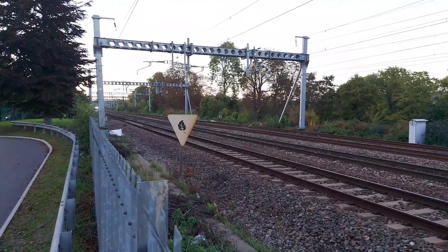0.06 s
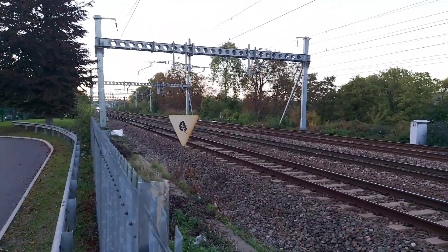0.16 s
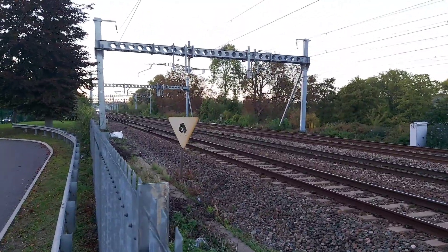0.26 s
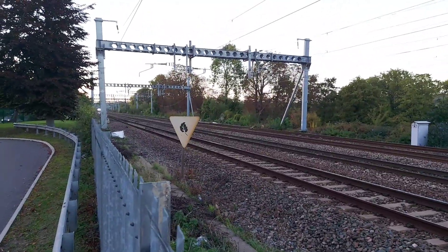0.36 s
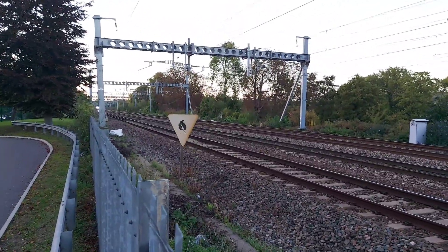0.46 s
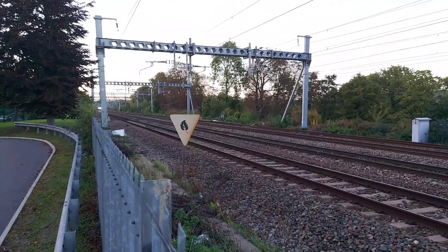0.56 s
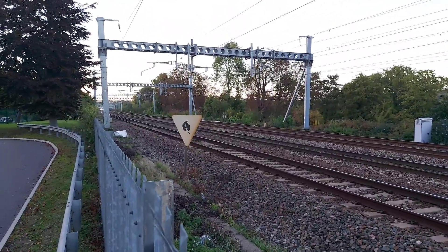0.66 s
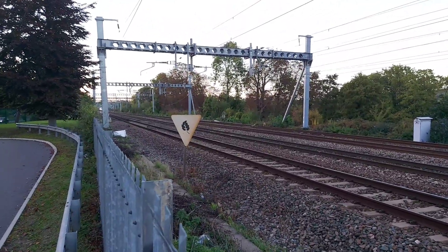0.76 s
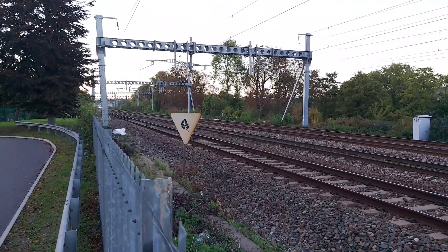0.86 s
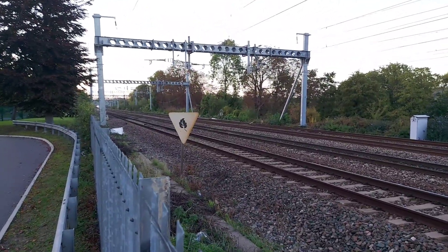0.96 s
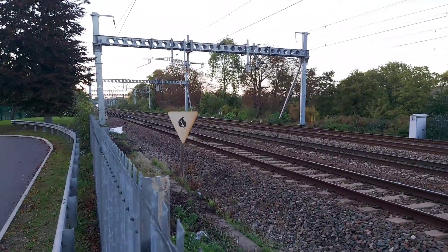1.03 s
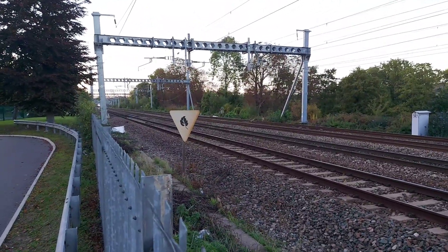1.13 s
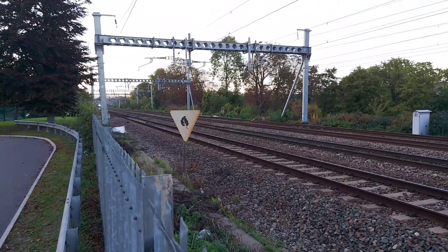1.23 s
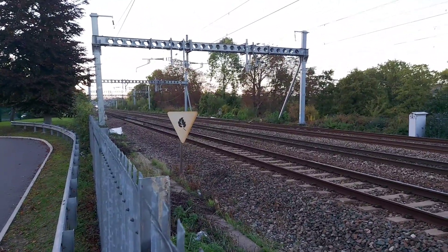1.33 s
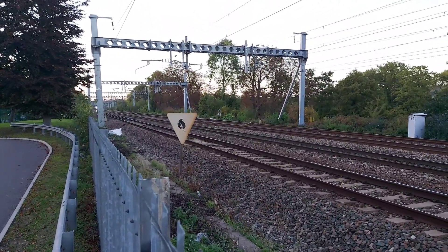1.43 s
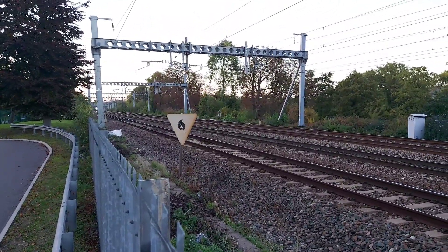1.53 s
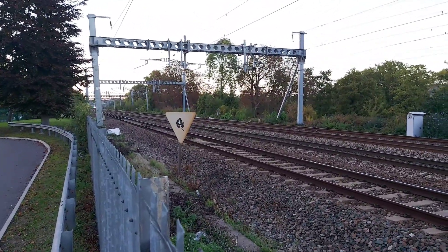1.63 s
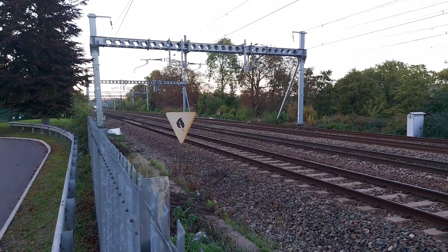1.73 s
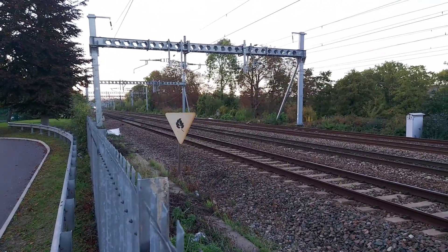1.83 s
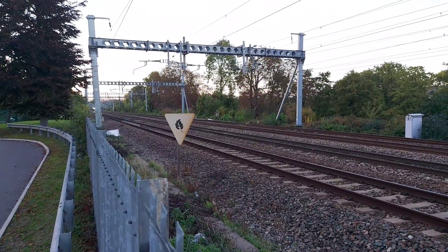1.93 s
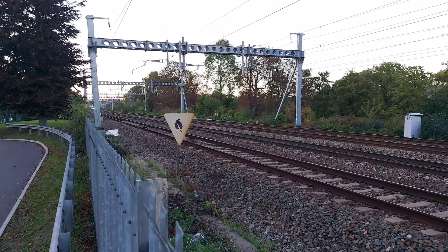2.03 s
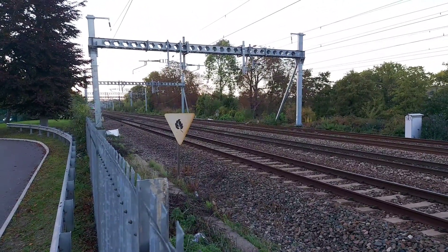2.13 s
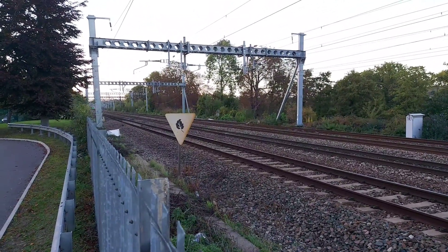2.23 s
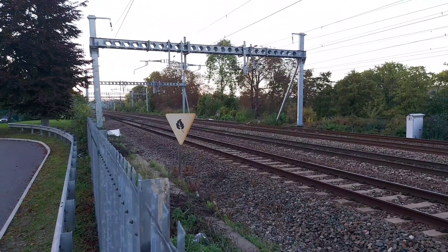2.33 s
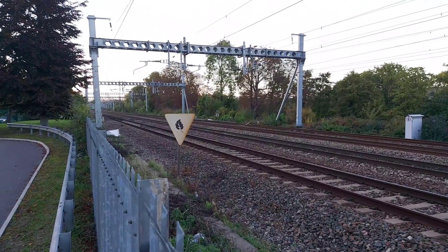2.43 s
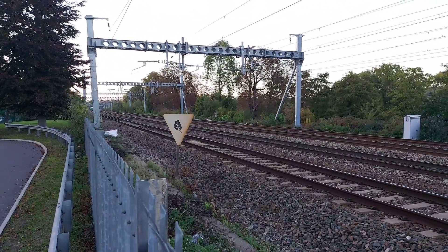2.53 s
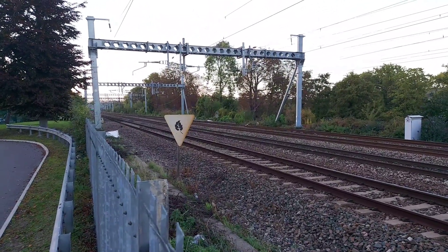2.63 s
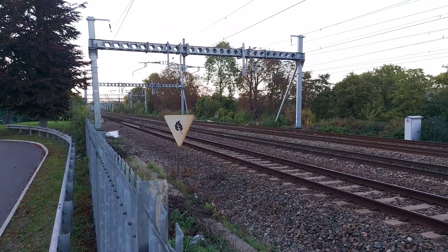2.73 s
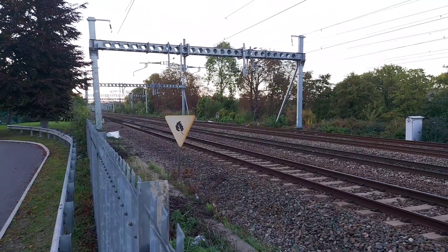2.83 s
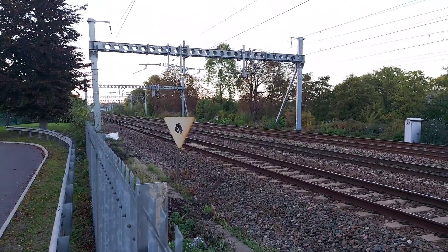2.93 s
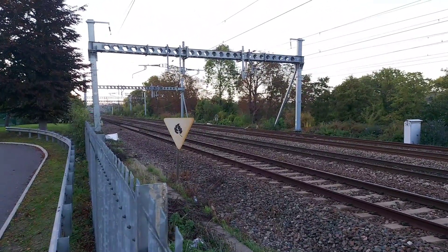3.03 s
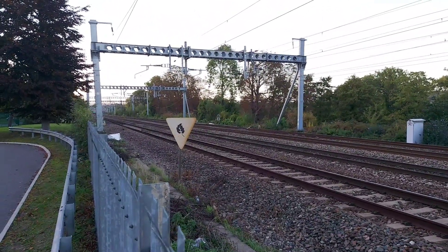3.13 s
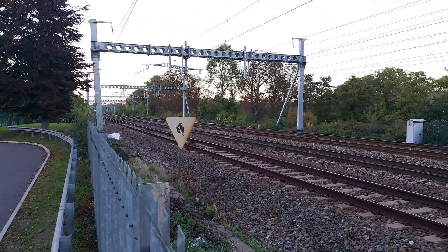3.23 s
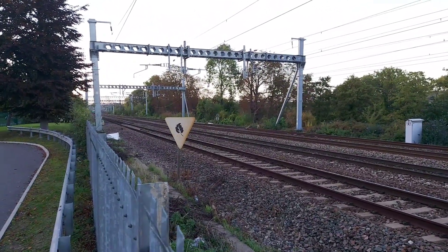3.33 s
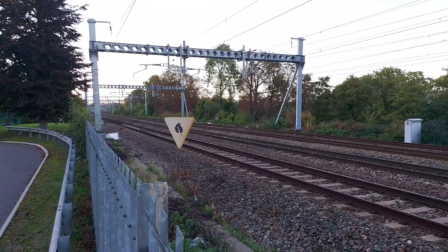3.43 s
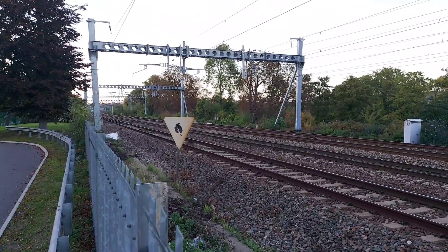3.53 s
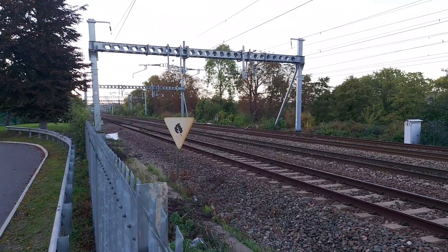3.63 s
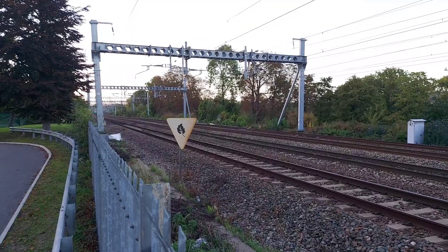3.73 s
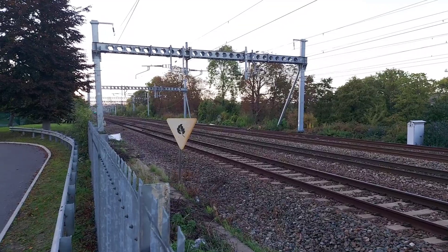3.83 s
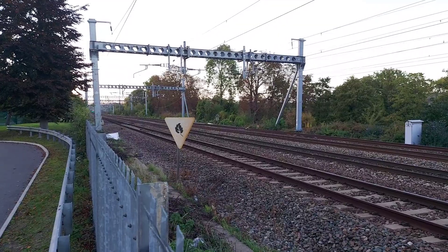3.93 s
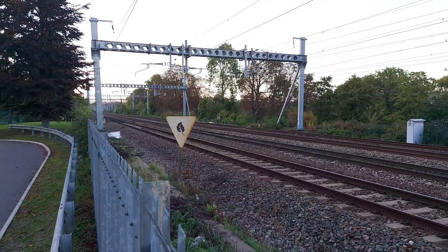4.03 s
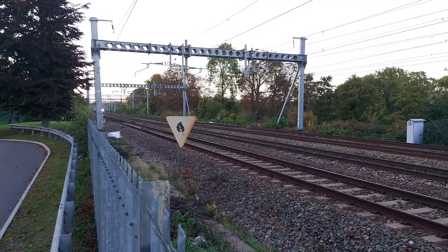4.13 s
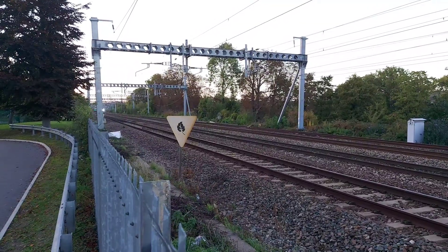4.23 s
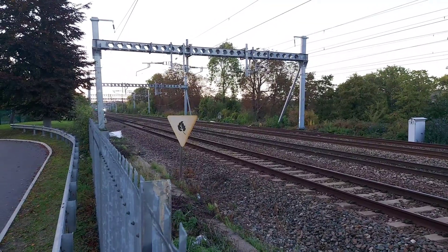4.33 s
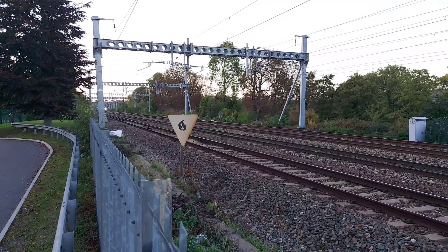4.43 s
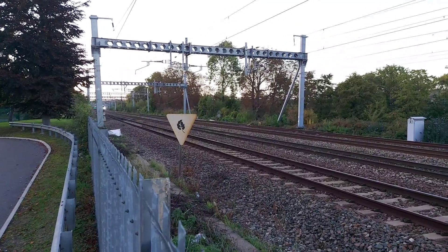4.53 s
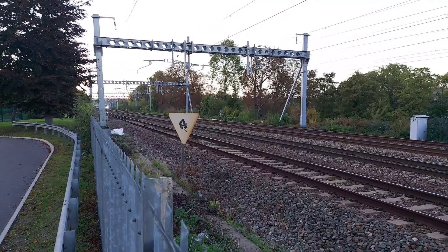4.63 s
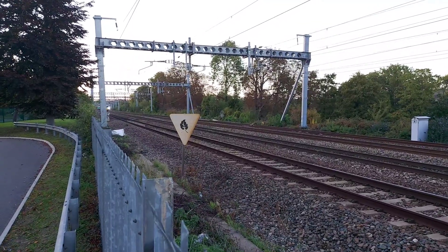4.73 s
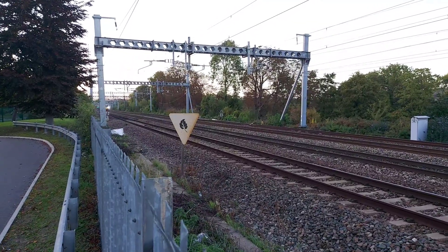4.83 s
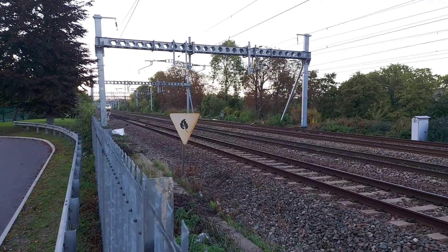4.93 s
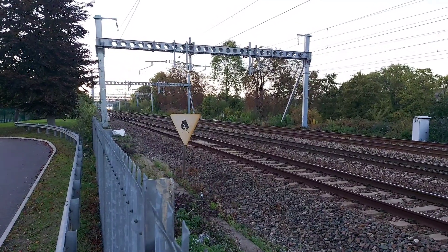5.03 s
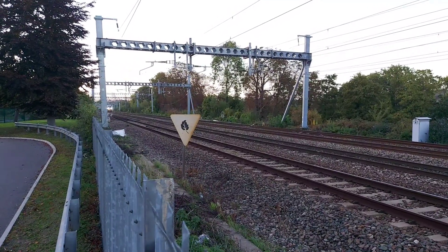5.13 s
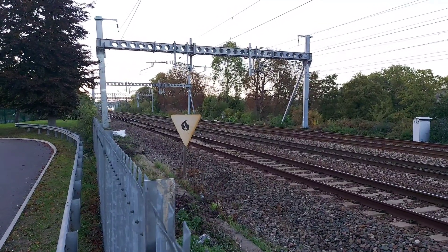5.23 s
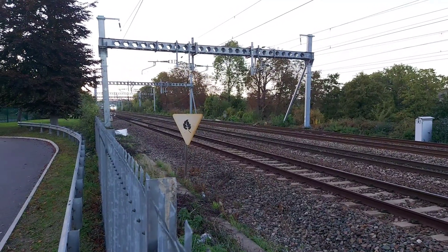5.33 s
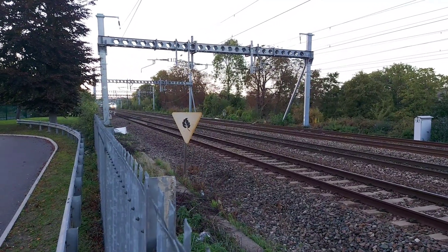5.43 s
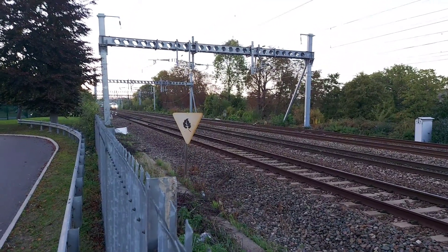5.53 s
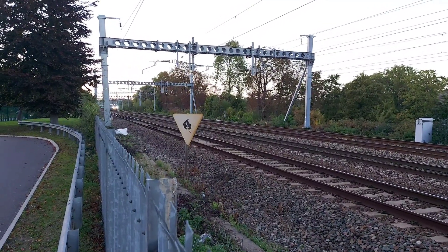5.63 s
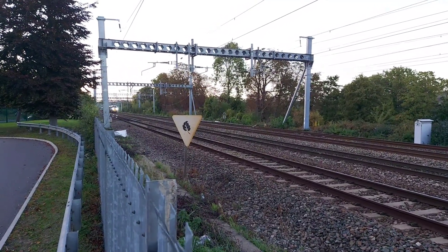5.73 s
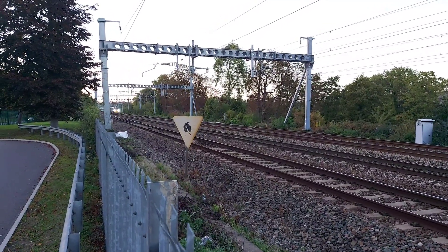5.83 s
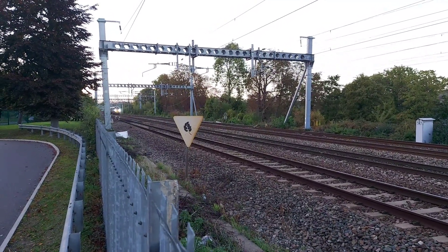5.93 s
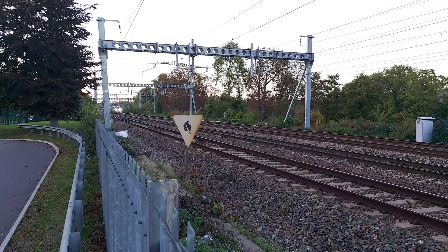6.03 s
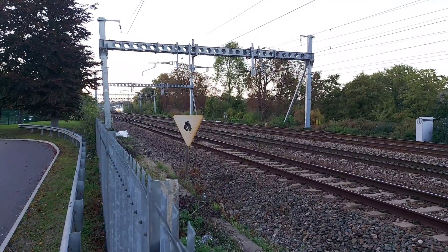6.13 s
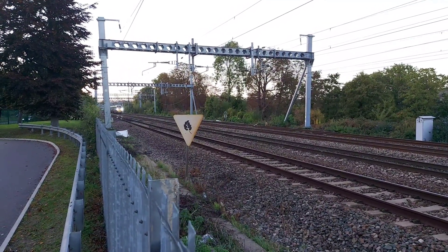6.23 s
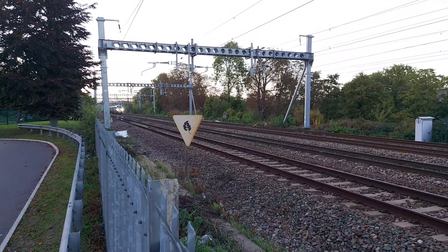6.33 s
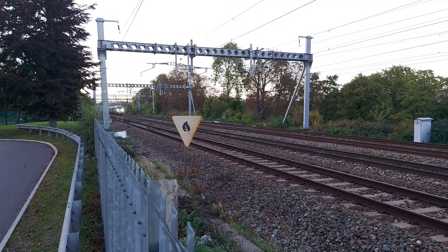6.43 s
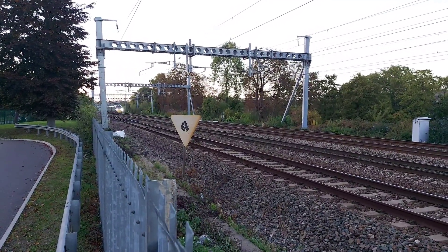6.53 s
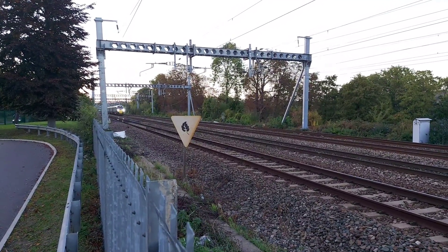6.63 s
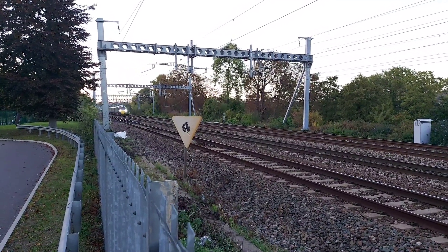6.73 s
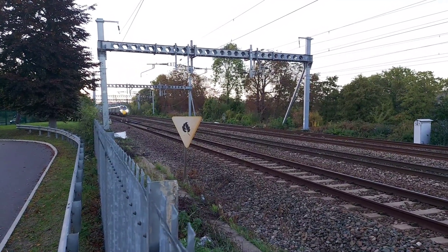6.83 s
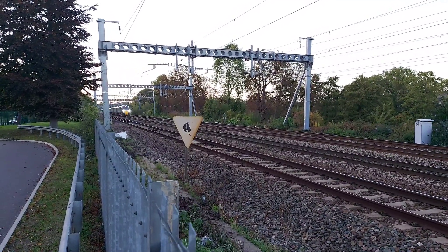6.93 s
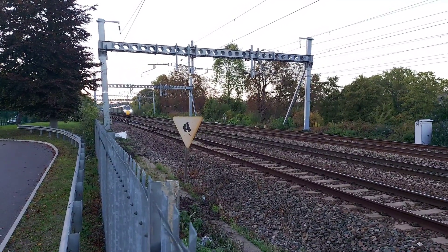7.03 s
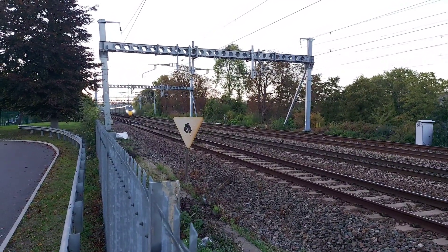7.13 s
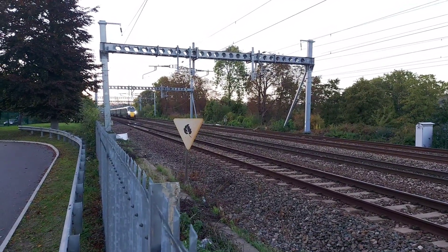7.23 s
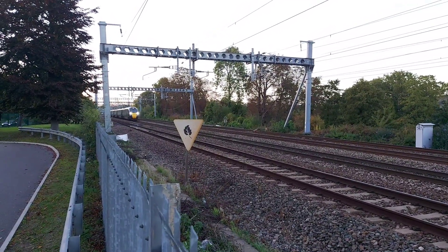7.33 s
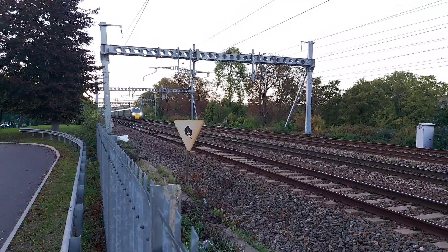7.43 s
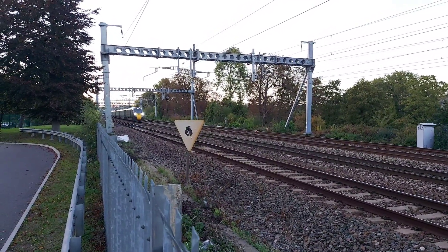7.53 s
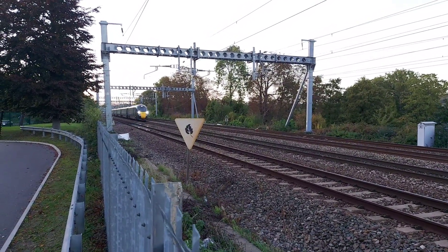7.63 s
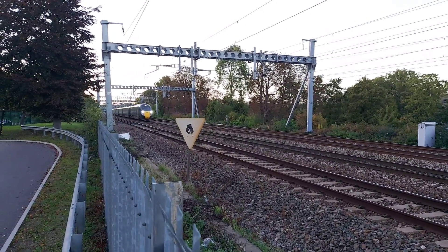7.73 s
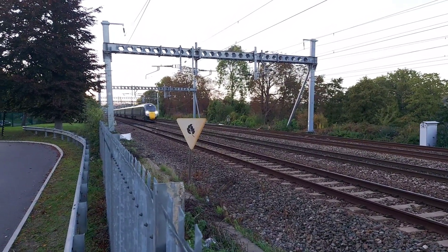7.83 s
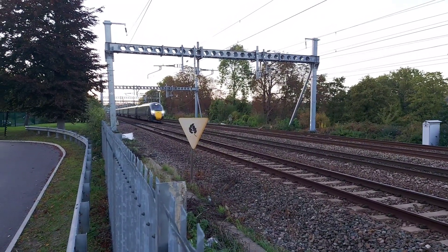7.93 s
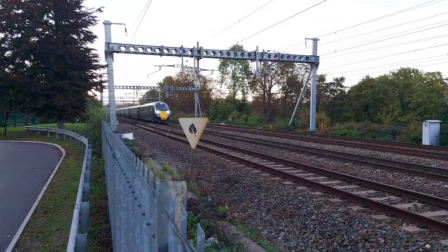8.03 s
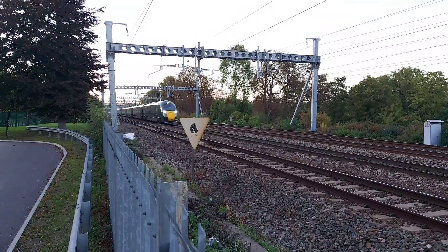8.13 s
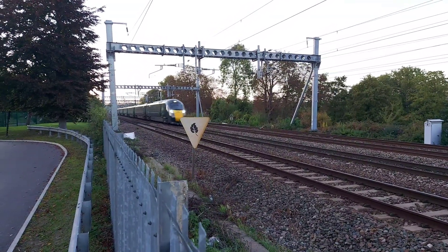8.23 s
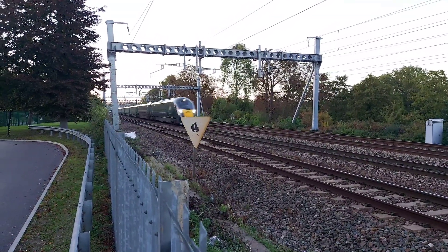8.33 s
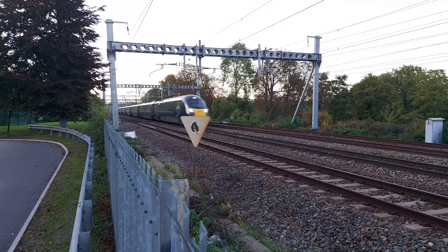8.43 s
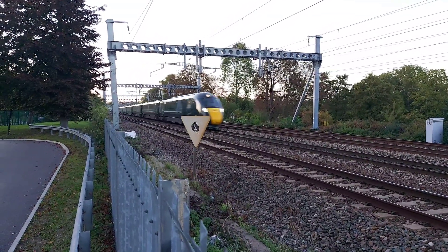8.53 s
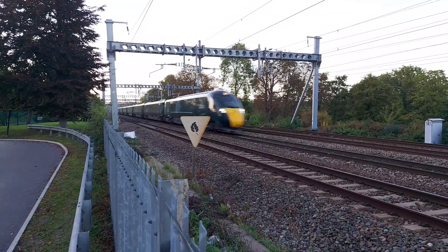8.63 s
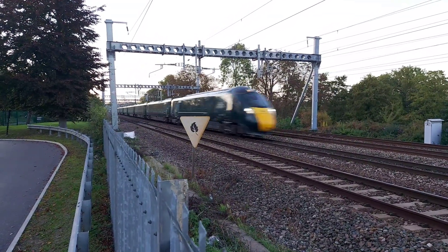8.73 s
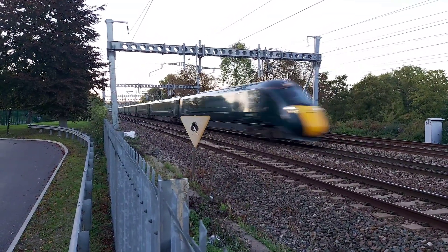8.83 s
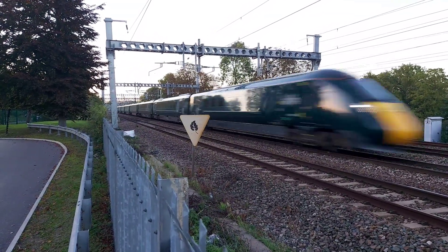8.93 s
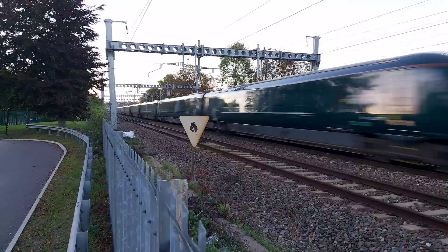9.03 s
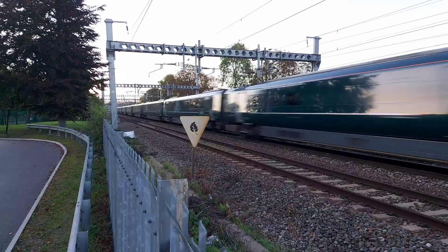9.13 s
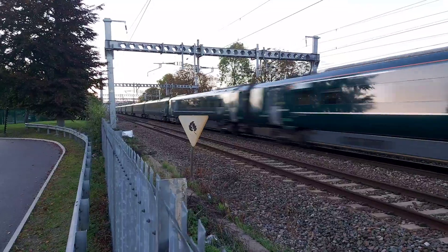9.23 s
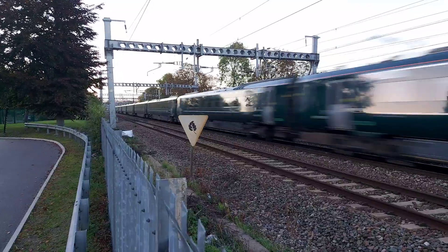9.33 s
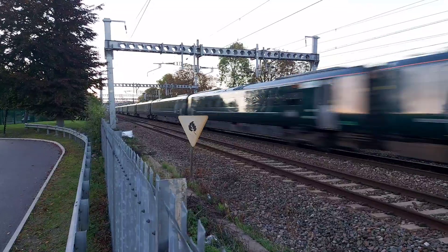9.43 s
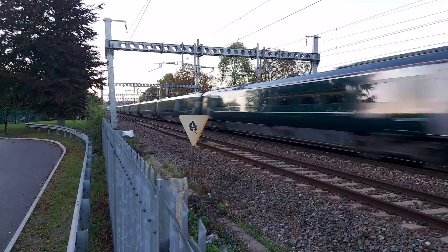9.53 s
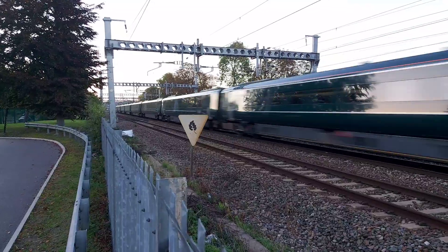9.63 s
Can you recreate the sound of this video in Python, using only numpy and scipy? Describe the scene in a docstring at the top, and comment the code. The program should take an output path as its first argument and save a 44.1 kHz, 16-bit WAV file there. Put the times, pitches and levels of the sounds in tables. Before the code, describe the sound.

Outdoors beside a railway, on a hand-held stereo phone: low traffic wash from the left, a few tiny bird whistles, dry ticks, and a car's tyres swelling softly near three seconds. Thin metallic singing rises in the rails, a dull roar grows behind it, then a fast electric train bursts past a few metres away, bright and rough, swinging right with a howl sinking in pitch.

```python
"""A fast electric train sweeps past a few metres from a hand-held phone, all built from shaped noise and tones.
It opens on far traffic to the left, bird whistles of bending sine, dry ticks of clipped-short noise, and a car
whose tyre noise crests near 3 s. The rails sing in narrow noise bands ahead of the train, over low rumble.
The roar of delayed noise from a row of bogies grows and brightens; near 9 s it surges and swings right.
A howl of noise-modulated tone sinks in pitch as the bow wave thumps the rumble, then a lull follows."""
import sys
import numpy as np
from scipy import signal
from scipy.fft import rfft, irfft, next_fast_len
from scipy.io import wavfile
from scipy.ndimage import map_coordinates

SR = 44100
rng = np.random.default_rng(int(sys.argv[2]) if len(sys.argv) > 2 else 0)


def to_wav(s):
    """Save 16-bit WAV."""
    ch = np.atleast_2d(s).T  # columns
    pcm = np.round(np.clip(ch, -1, 1) * 32767)  # PCM
    wavfile.write(sys.argv[1], SR, pcm.astype(np.int16))


N = 426447

# Level of the far traffic wash: (time [s], level [dB])
ROAD_LEVEL = [(0, -38), (1, -37.5), (2, -36.5), (3.2, -35), (9.67, -29)]
# Colour of the traffic wash: (frequency [Hz], relative level [dB])
ROAD_COLOUR = [(22, -10), (45, 3), (75, 2.5), (130, -5.5), (265, -5.5), (420, -21), (850, -11), (1300, -14),
               (2000, -19), (3000, -31.5), (4200, -41), (6000, -87), (8300, -69), (12000, -62),
               (15000, -60)]
# Level of a passing car's tyres: (time [s], level [dB])
CAR_LEVEL = [(0, -62), (1.2, -58.5), (2, -47), (3.2, -40.5), (4.2, -41), (5.5, -42.5), (9.67, -53)]
# Colour of the tyre noise: (frequency [Hz], relative level [dB])
TYRE_COLOUR = [(60, 4.5), (110, 10.5), (170, -3), (260, 1.5), (450, -8), (900, 0.5), (1300, -11),
               (2100, -4), (3000, -15.5), (4000, -14.5), (5800, -26), (7000, -39), (8500, -56),
               (16000, -69)]
# Bird whistles: (time [s], length [s], start pitch [Hz], end pitch [Hz], relative level [dB])
BIRD_WHISTLES = [(.66, .1, 3750, 4150, -62), (2.85, .1, 5600, 5800, -61), (2.98, .17, 6080, 6000, -62),
                 (3.11, 0.093, 4200, 4060, -57), (3.14, .11, 6100, 5900, -62),
                 (3.74, 0.51, 8570, 8590, -80)]
# Dry snaps: (time [s], peak level [dB])
TICK_HITS = [(1.697, -48), (2.578, -46), (5.572, -44), (5.592, -39), (5.602, -31)]
# Colour of the ground rumble: (frequency [Hz], relative level [dB])
RUMBLE_COLOUR = [(25, -16), (35, 12), (45, 26), (60, 26.5), (78, 27), (100, 15.5), (130, -1), (190, -42.5)]
# Rumble against nose distance: (close level [dB], knee [m], loss per doubling of distance [dB])
RUMBLE_DISTANCE = (-23.5, 73.4, 9.6)
# Waves guided by the rails:
# (centre [Hz], width [Hz], top level [dB], loss [dB/m], nose distance ahead when loudest [m])
RAIL_BANDS = [(1984, 24, -38, .42, 42), (1770, 160, -41, .24, 38), (3400, 140, -52.5, 0.5, 36),
              (3900, 380, -46, .23, 26), (5260, 670, -50.5, .7, 78), (6660, 710, -49, .3, 2),
              (7110, 170, -58.5, .3, 52), (10000, 3770, -47.5, .88, 13), (12115, 444, -58.8, .56, 80),
              (12650, 1320, -47, 1.02, 34), (13820, 1320, -46, .43, 37), (15150, 930, -52.8, .275, 40)]
# Stereo tilt of sound from up the line: (frequency [Hz], left minus right [dB])
AHEAD_TILT = [(200, -2), (600, 1.5), (1300, 5.5), (1850, 5.5), (2400, 7.5), (3300, 1), (4600, 2), (6500, 0),
              (8000, 0), (10000, 9), (12000, -2), (15000, 1.5)]
# Stereo tilt of the train close by: (frequency [Hz], left minus right [dB])
CLOSE_TILT = [(60, 0.0), (110, -1), (200, 0), (380, 0.5), (700, -0.5), (1290, 7.5), (2380, 7), (4400, -5.5),
              (8120, 1), (15000, 19)]
# Steady whine against nose distance: (close level [dB], knee [m], loss per doubling of distance [dB])
WHINE_DISTANCE = (-31, 30, 11.6)
# Bogies sweeping by: (time [s], strength of the surge [0-1], peak of the whine burst [dB])
BOGIE_SURGES = [(8.78, 0.65, -36), (9.13, 1, -24.5), (9.53, 0.66, -21)]
# Colour of the distant train: (frequency [Hz], relative level [dB])
FAR_COLOUR = [(110, 4), (165, -8.5), (240, 1), (370, -6.5), (520, -10), (900, -8.5), (1250, -15.5),
              (1950, -10), (2400, -14.5), (3300, -21.5), (5000, -30.5), (6900, -45), (8200, -59),
              (16000, -79)]
# Colour of the train close by: (frequency [Hz], relative level [dB])
CLOSE_COLOUR = [(110, -8), (170, -0.5), (230, 0), (370, -6.5), (520, -13.5), (640, -6), (760, -2),
                (950, -8), (1200, -10), (1480, -1), (2200, -6.5), (2750, -15), (6800, -25), (8500, -33),
                (16000, -49)]
# Wheel resonances added to the close colour: (centre [Hz], width [Hz], boost [dB])
WHEEL_RINGS = [(1380, 30, 2.5), (1580, 20, -2), (2000, 16, 8), (2333, 17, 6)]
# Edges of the four train bands: (frequency [Hz])
BAND_EDGES = [98, 450, 1150, 2700, 20000]
# Air rush, track roar, wheel ring, contact hiss: (close level [dB], knee [m],
# loss per doubling of distance [dB], surge [dB], surge delay [s], reach of the close colour [m])
BAND_LEVELS = [(-22, 16.7, 5, 1.5, -0.084, 36), (-23.5, 22.5, 6, 4, -0.014, 49),
               (-22, 20.9, 6.5, 2, -0.027, 29), (-28, 27.9, 8, 2.5, 0.075, 21.5)]
# Path down the line, as the train comes out from behind trees at a far bend: (time [s], gain [dB])
PATH_GAIN = [(0, -4), (1.2, -3), (1.9, -1.1), (3, -0.8), (4.4, 1.5), (6.7, -1.4), (7.8, -0.2)]
# Part of the sound that arrives scattered: (frequency [Hz], share of the power [0-1])
SCATTER_SHARE = [(60, 0.0043), (150, 0.01), (300, 0.02), (550, 0.26), (1200, 0.31), (2500, 0.44),
                 (6000, 0.58), (13000, 0.94)]

SPEED, TRACK_DISTANCE, TRACK_BEARING, ABREAST_S = 48.2, 7.4, -0.35, 9.165  # m/s, m, radians, s
COACH_LENGTH, BOGIE_SPACING = 29.2, 16.7  # m
PORT_LAG_S = 0.0005  # travel time between the two microphones
RAIL_SPREAD_M = 155  # length of the broad crest before the steady loss per metre sets in
SURGE_S, HOWL_S = 0.082, 0.049  # half-lengths of a surge and of its burst of whine
GUST_S, GUST_LENGTH_S, GUST_DB, LULL_DB = 9.32, 0.042, 9, -7  # bow-wave thump and the lull after it
TOP_HZ = 15700  # upper limit of the phone
TIME = np.arange(N) / SR
SIZE = next_fast_len(N, True)
FREQ = np.maximum(np.arange(SIZE // 2 + 1) * SR / SIZE, 1)
SIDES = np.array([[1], [-1]])  # left, right


def undb(db):
    """Decibels to gain."""
    return np.exp(np.asarray(db) * (np.log(10) / 20))


def unit(x):
    """Scale to rms 1."""
    return x / np.sqrt(np.mean(x ** 2))


def envelope(rows):
    """A (time, value) table joined by straight lines."""
    s, value = np.transpose(rows)
    return np.interp(TIME, s, value)


def shape(points):
    """A (frequency, value) table joined on a log-frequency axis."""
    hz, value = np.transpose(points)
    return np.interp(np.log(FREQ), np.log(hz), value)


def stereo_colour(colour_db, tilt):
    """Gain of a colour, with half the left-minus-right tilt given to each side."""
    return undb(colour_db + SIDES * shape(tilt) / 2)


def white(channels=2):
    """Spectra of unrelated white noises of rms 1."""
    real = rng.standard_normal((channels, len(FREQ)))
    imaginary = rng.standard_normal((channels, len(FREQ)))
    return (real + 1j * imaginary) * np.sqrt(SIZE / 2)


def sound(spectrum):
    """A spectrum as a waveform of rms 1."""
    return unit(irfft(spectrum, SIZE)[:, :N])


def flutter(rate, depth_db):
    """A gain that wanders at random, through rate new values a second."""
    steps = rng.standard_normal(1024)
    return undb(depth_db * np.interp(TIME * rate, np.arange(len(steps)), steps))


def swell(s, half_length):
    """A smooth rise and fall, 1 at time s."""
    return np.exp(-.5 * ((TIME - s) / half_length) ** 2)


def resonance(hz, width_hz):
    """Gain of a steep-sided peak, 1 at the centre."""
    return 1 / (1 + ((FREQ - hz) / width_hz) ** 2) ** 2


def ripple(spacing_hz, depth_db):
    """Fine, uneven peaks and dips along frequency, different at each microphone."""
    steps = rng.standard_normal((2, 2048))
    wander = [np.interp(FREQ / spacing_hz, np.arange(len(row)), row) for row in steps]
    return undb(depth_db * np.array(wander))


def nose_ahead():
    """Metres that the nose still has to go before it is abreast; negative once it is past."""
    return SPEED * (ABREAST_S - TIME)


def fade(close_db, knee_m, doubling_db):
    """Level in dB of a long source: steady alongside, falling per doubling of distance beyond the knee."""
    distance = np.maximum(nose_ahead(), 0)
    return close_db - doubling_db * np.log2(np.hypot(distance / knee_m, 1))


def port_lag(ahead):
    """Seconds by which the left microphone hears a point, ahead metres up the line, after the right."""
    return PORT_LAG_S * np.sin(TRACK_BEARING + np.arctan2(TRACK_DISTANCE, ahead))


def outdoors(direct):
    """Part of a sound comes by way of fence, trees and ballast, and differs at the two microphones."""
    share = np.clip(shape(SCATTER_SHARE), 0, 1)
    return np.sqrt(1 - share) * direct + np.sqrt(share) * white()


def noise_from(bearing):
    """Noise spectrum from a bearing (radians, left negative): the nearer microphone hears it first."""
    lag = PORT_LAG_S * np.sin(bearing)
    return outdoors(white(channels=1) * np.exp(-1j * np.pi * FREQ * lag * SIDES))


def road():
    """A wash of traffic far off to the left, slowly swelling."""
    tilt = [(300, 1.5), (1000, 0.5), (2200, 1.5), (4000, 5), (12000, 2)]
    wash = sound(noise_from(bearing=-0.91) * stereo_colour(shape(ROAD_COLOUR), tilt))
    return wash * undb(envelope(ROAD_LEVEL)) * flutter(rate=5, depth_db=0.5)


def car():
    """Tyre noise swells and fades on the road to the left."""
    tilt = [(300, -1), (1000, 2.5), (2200, 3), (3200, 2), (6000, 0.0)]
    tyres = sound(noise_from(bearing=-0.73) * stereo_colour(shape(TYRE_COLOUR), tilt))
    return tyres * undb(envelope(CAR_LEVEL)) * flutter(rate=6.7, depth_db=0.4)


def birds(echo_s=.03, quaver_hz=90, quaver_rate=250):
    """Thin whistles of sine with a random quaver, blurred by the trees around them."""
    whistles = np.zeros(N)
    for s, length, start_hz, end_hz, db in BIRD_WHISTLES:
        u = np.linspace(0, 1, int(length * SR))  # progress through the note
        start = int(s * SR)
        steps = rng.standard_normal(size=256)
        quaver = np.interp(u * length * quaver_rate, np.arange(len(steps)), steps)
        hz = start_hz + (end_hz - start_hz) * u + quaver_hz * quaver
        tone = np.sin(2 * np.pi * np.cumsum(hz) / SR)
        whistles[start:start + len(u)] += undb(db) * np.sin(np.pi * u) ** .5 * tone
    # the trees answer with a short burst of decaying noise, different on each side
    leaves = rng.standard_normal((2, 8192)) * np.exp(-TIME[:8192] / echo_s)
    leaves /= np.linalg.norm(leaves, axis=1, keepdims=True)
    blur = signal.oaconvolve(whistles[None], leaves, axes=1)[:, :N]
    return (whistles + blur) / np.sqrt(2)


def ticks(decay_s=0.0007):
    """Tiny dry snaps close by: band-passed noise that dies within milliseconds."""
    out = np.zeros(N)
    body = signal.butter(4, [2500, 6200], "band", fs=SR, output="sos")
    for s, db in TICK_HITS:
        burst = rng.standard_normal(512) * np.exp(-TIME[:512] / decay_s)
        snap = signal.sosfilt(body, burst)
        start = int(s * SR)
        out[start:start + len(snap)] += undb(db) * snap / np.abs(snap).max()
    return out


def rumble(lull_after_s=0.096):
    """The deep shudder of ground and air; the bow wave thumps just behind the nose, then a lull."""
    gust = GUST_DB * swell(GUST_S, GUST_LENGTH_S)
    lull = LULL_DB * swell(GUST_S + lull_after_s, GUST_LENGTH_S)
    shudder = sound(noise_from(bearing=TRACK_BEARING) * undb(shape(RUMBLE_COLOUR)))
    return shudder * undb(fade(*RUMBLE_DISTANCE) + gust + lull)


def rails():
    """Vibration runs far ahead in the steel in separate bands; a greater loss per metre rises faster."""
    # each band is a cluster of close modes
    colour = stereo_colour(0, AHEAD_TILT) * ripple(spacing_hz=55.1, depth_db=2.5)
    field = noise_from(bearing=TRACK_BEARING) * colour
    out = 0
    for hz, width_hz, top_db, loss_db_per_m, loudest_m in RAIL_BANDS:
        through_steel = np.hypot(nose_ahead() - loudest_m, RAIL_SPREAD_M) - RAIL_SPREAD_M
        gain = undb(top_db - loss_db_per_m * through_steel) * flutter(rate=14, depth_db=1.3)
        out = out + gain * sound(field * resonance(hz, width_hz))
    return out * flutter(rate=16, depth_db=0.7)


def whine(abreast_hz=748, doppler_hz=60, glide_m=28, width_hz=60, behind_nose=22, left_db=2.0):
    """A rough howl from the running gear bursts out as bogies sweep by, and sinks in pitch as it passes."""
    ahead = nose_ahead() + behind_nose
    hz = abreast_hz + doppler_hz * ahead / np.hypot(ahead, glide_m)
    steady = undb(fade(*WHINE_DISTANCE)) ** 2
    bursts = sum((undb(db) * swell(s, HOWL_S)) ** 2 for s, _, db in BOGIE_SURGES)
    phase = 2 * np.pi * (np.cumsum(hz) / SR - hz * port_lag(ahead) * SIDES / 2)
    # two slow noises on a cosine and a sine roughen the tone
    a, b = sound(white() * resonance(0, width_hz))
    howl = a * np.cos(phase) + b * np.sin(phase)
    return howl * np.sqrt(steady + bursts) * undb(SIDES * left_db / 2)


def bogies(count=6, falloff=0.5):
    """Noise spectrum of a row of bogies; the nearest leads, and each swings right as it passes."""
    field, power = 0, 0
    for k in range(count):
        ahead = nose_ahead() + k // 2 * COACH_LENGTH + k % 2 * BOGIE_SPACING
        # each shakes a stretch of rail, so it fades more slowly than a point source
        gain = np.hypot(ahead, TRACK_DISTANCE) ** -falloff
        right = rng.standard_normal(N)
        heard_at = np.arange(N) - port_lag(ahead) * SR
        left = map_coordinates(right, [heard_at], order=3, mode="mirror")
        field = field + gain * np.array([left, right])
        power = power + gain ** 2
    return outdoors(rfft(field / np.sqrt(power), SIZE))


def train():
    """Air rush, track roar, wheel ring and hiss: dull afar, resonant and bright close by, with surges."""
    field = bogies()
    wheels_db = sum(db * resonance(hz, width_hz) for hz, width_hz, db in WHEEL_RINGS)
    far = field * stereo_colour(shape(FAR_COLOUR), AHEAD_TILT)
    close = field * stereo_colour(shape(CLOSE_COLOUR) + wheels_db, CLOSE_TILT)
    out = 0
    for lo, hi, levels in zip(BAND_EDGES, BAND_EDGES[1:], BAND_LEVELS):
        close_db, knee_m, doubling_db, surge_db, delay_s, reach = levels
        band = 1 / (1 + (lo / FREQ) ** 16) / (1 + (FREQ / hi) ** 16)
        nearness = 1 / (1 + (np.maximum(nose_ahead(), 0) / reach) ** 4)
        blend = (1 - nearness) * sound(band * far) + nearness * sound(band * close)
        surge = sum(strength * swell(s + delay_s, SURGE_S) for s, strength, _ in BOGIE_SURGES)
        db = fade(close_db, knee_m, doubling_db) + surge_db * surge + envelope(PATH_GAIN)
        out = out + blend * undb(db) * flutter(rate=22, depth_db=0.96)
    return out


def scene():
    """The train and its rails over the quiet lineside."""
    lineside = road() + car() + birds() + ticks()
    return lineside + rumble() + rails() + whine() + train()


def record(dry):
    """The phone cuts the deepest bass and the top."""
    bass_cut = signal.butter(4, 32, "high", fs=SR, output="sos")
    top_cut = signal.ellip(10, .2, 80, TOP_HZ, fs=SR, output="sos")
    return signal.sosfilt(top_cut, signal.sosfilt(bass_cut, dry))


dry = scene()
out = record(dry)
to_wav(out)
```